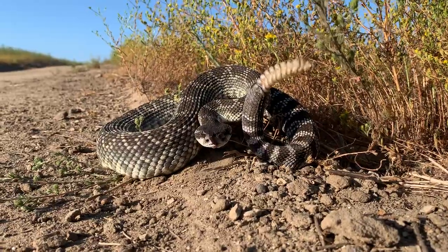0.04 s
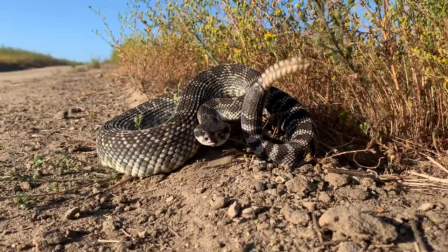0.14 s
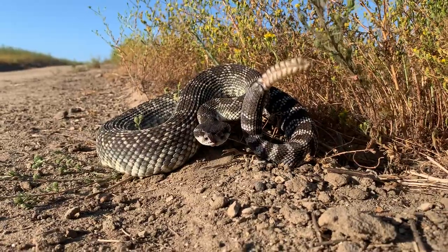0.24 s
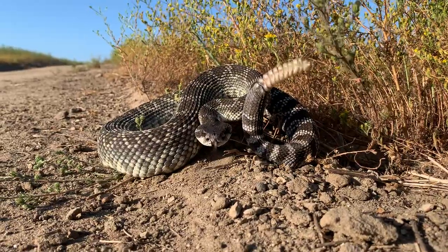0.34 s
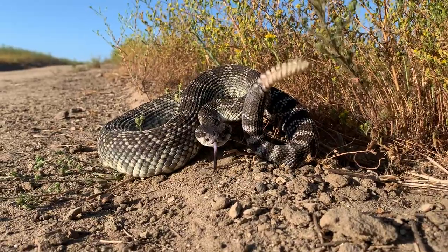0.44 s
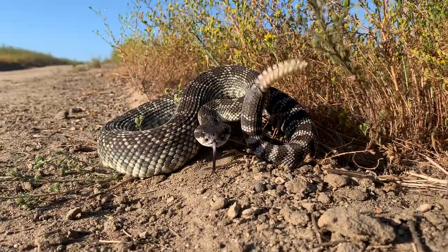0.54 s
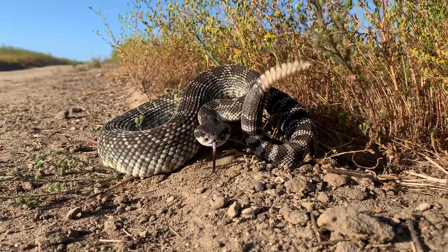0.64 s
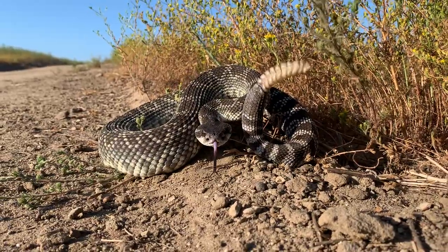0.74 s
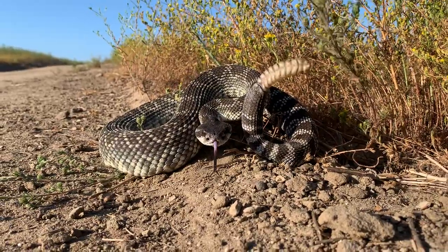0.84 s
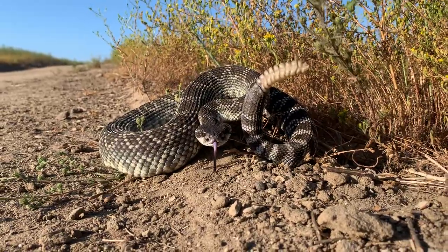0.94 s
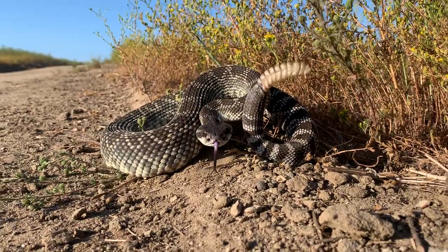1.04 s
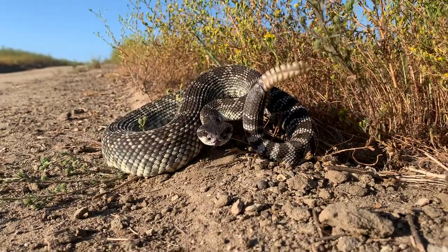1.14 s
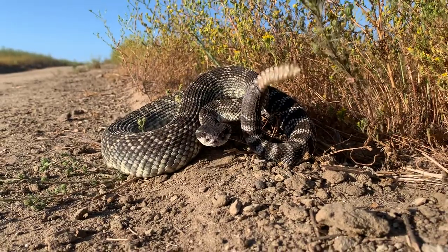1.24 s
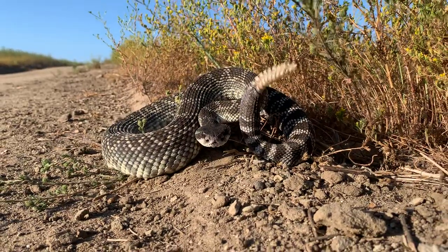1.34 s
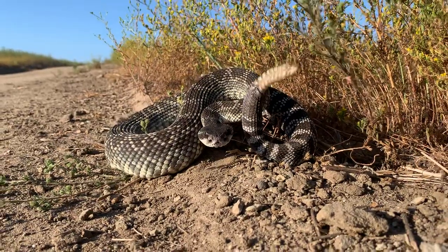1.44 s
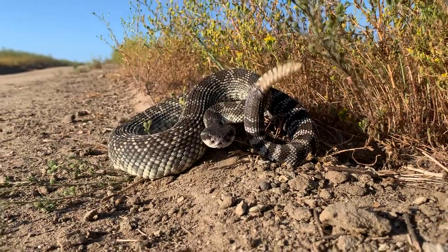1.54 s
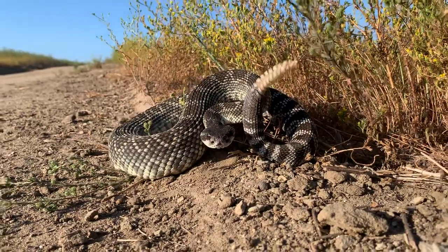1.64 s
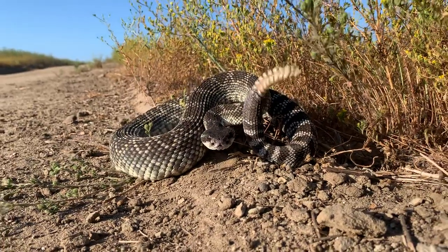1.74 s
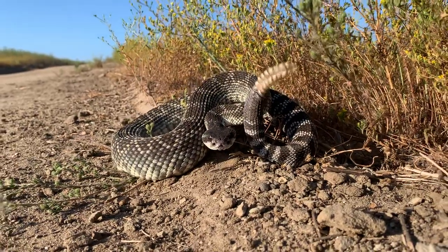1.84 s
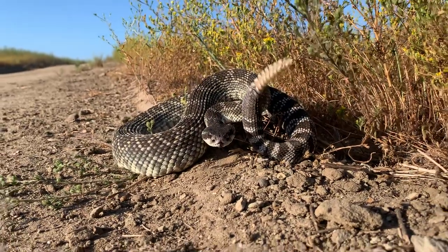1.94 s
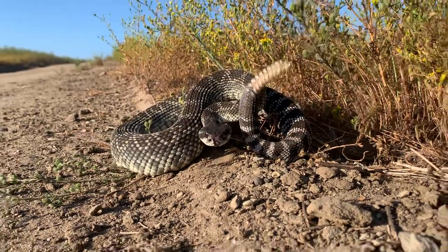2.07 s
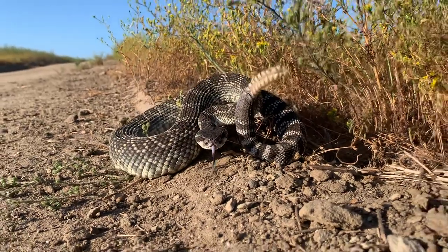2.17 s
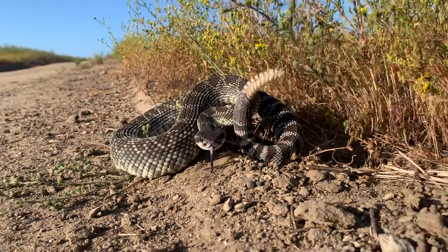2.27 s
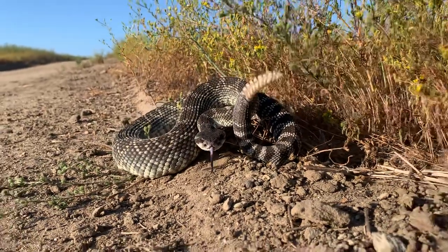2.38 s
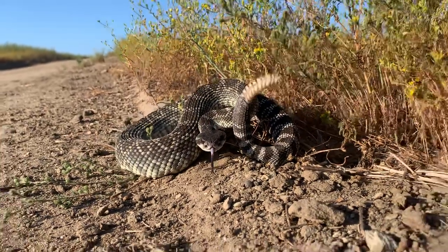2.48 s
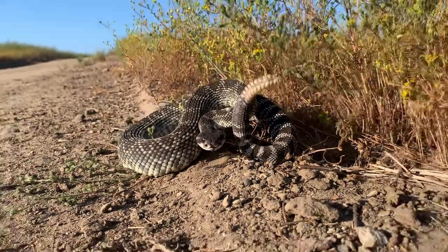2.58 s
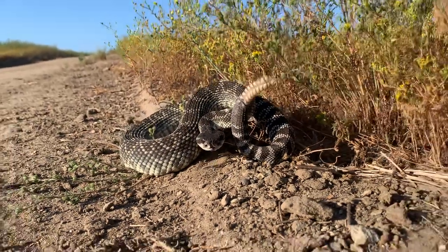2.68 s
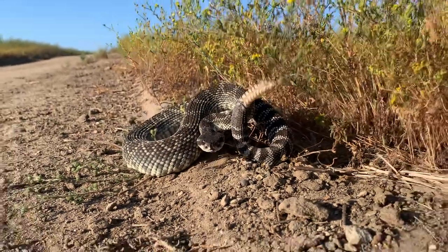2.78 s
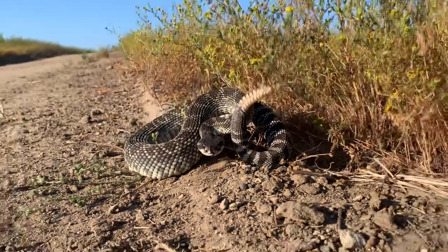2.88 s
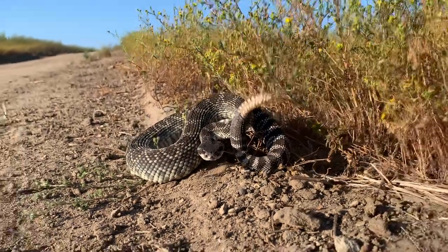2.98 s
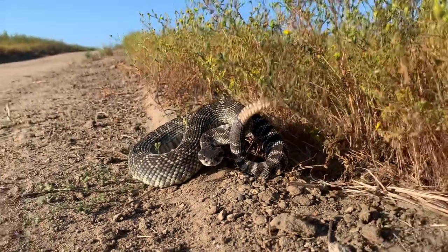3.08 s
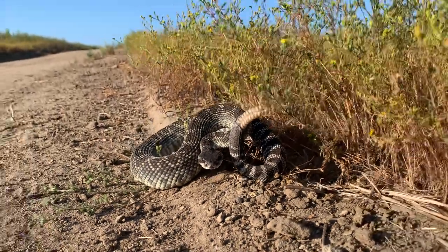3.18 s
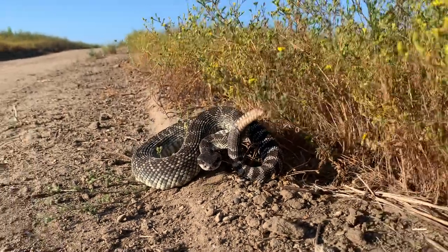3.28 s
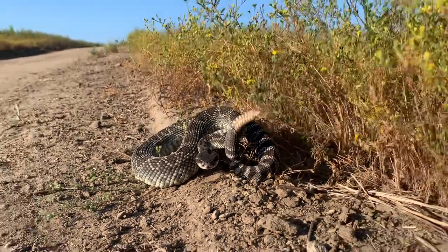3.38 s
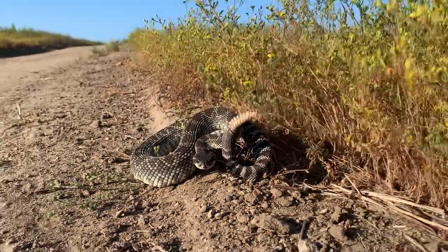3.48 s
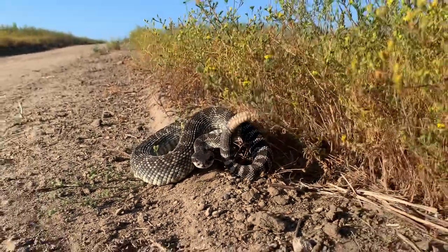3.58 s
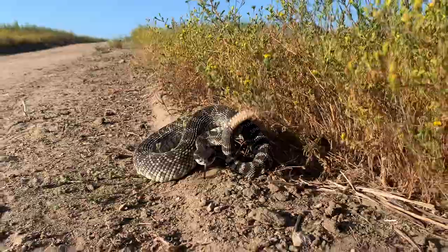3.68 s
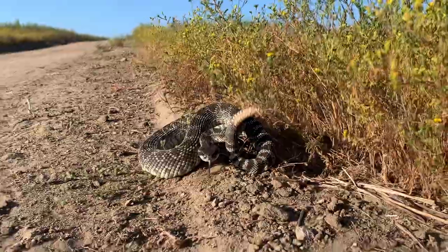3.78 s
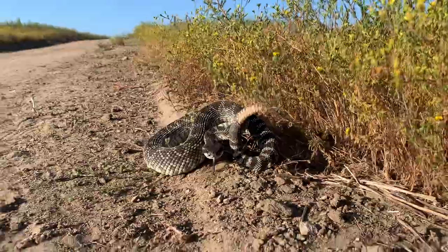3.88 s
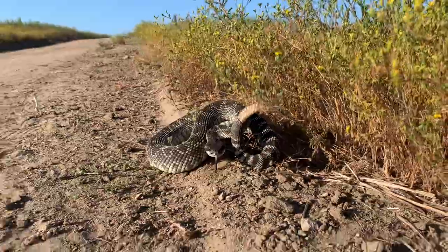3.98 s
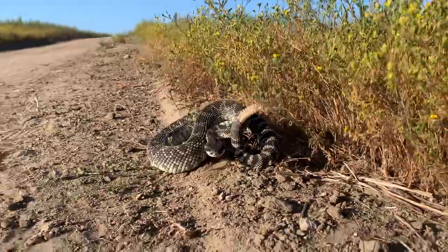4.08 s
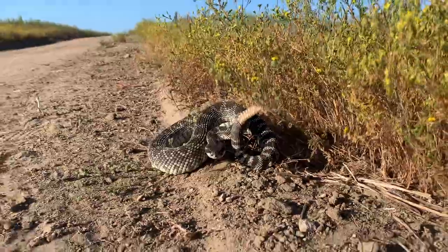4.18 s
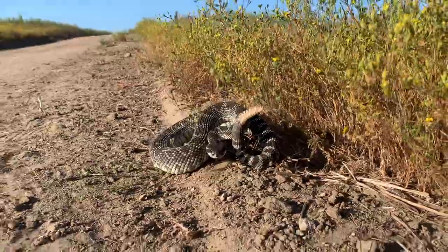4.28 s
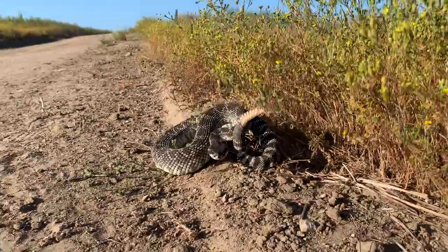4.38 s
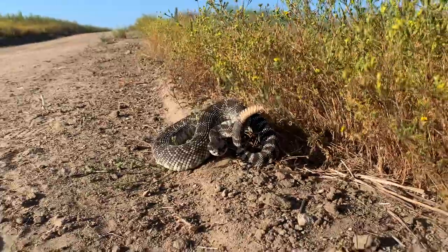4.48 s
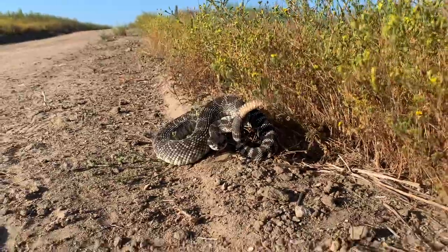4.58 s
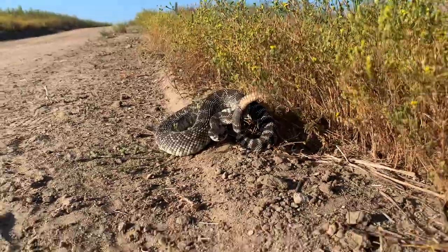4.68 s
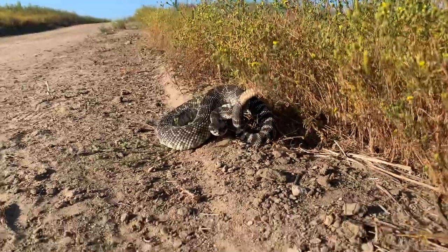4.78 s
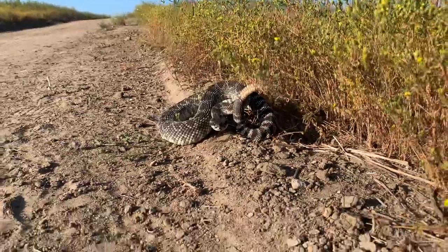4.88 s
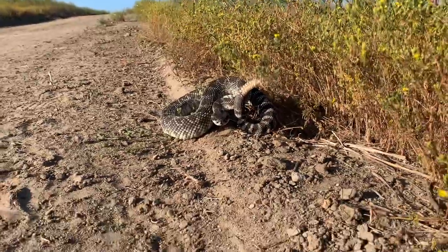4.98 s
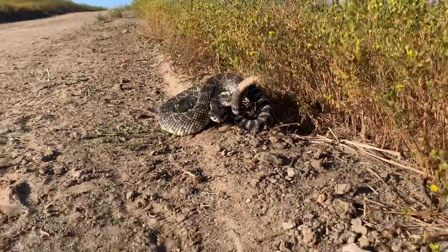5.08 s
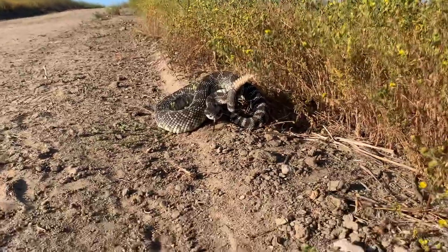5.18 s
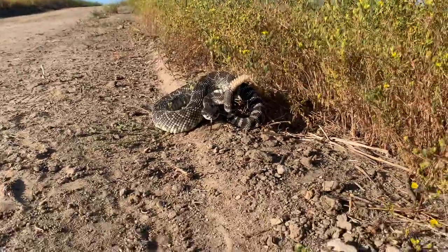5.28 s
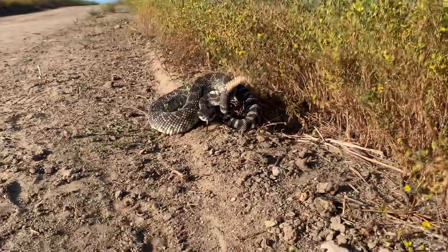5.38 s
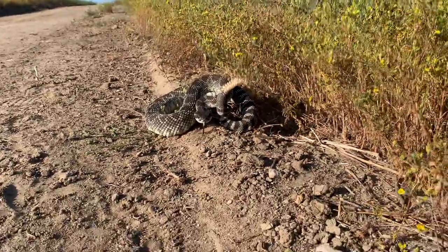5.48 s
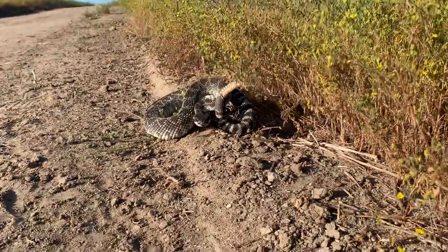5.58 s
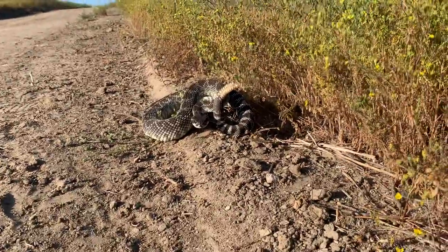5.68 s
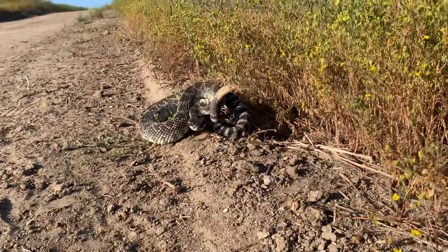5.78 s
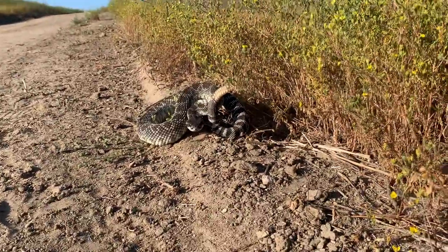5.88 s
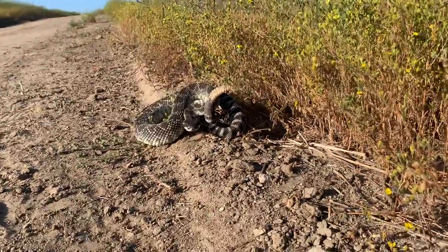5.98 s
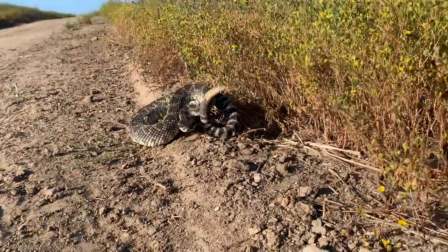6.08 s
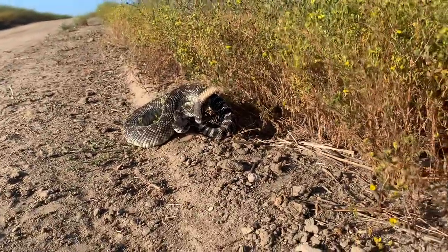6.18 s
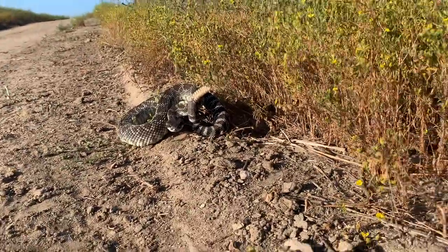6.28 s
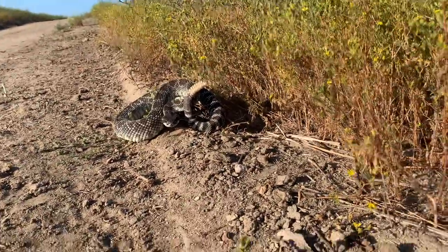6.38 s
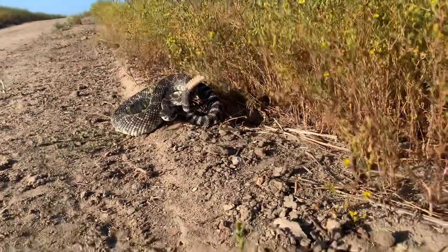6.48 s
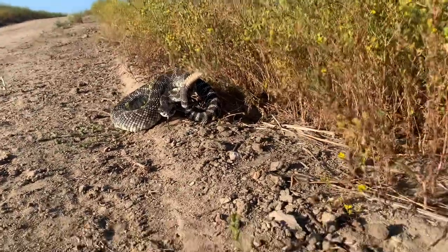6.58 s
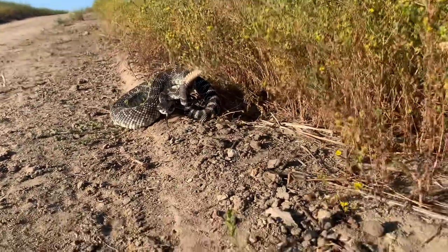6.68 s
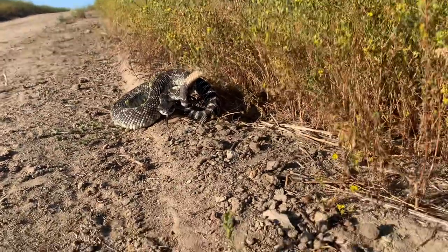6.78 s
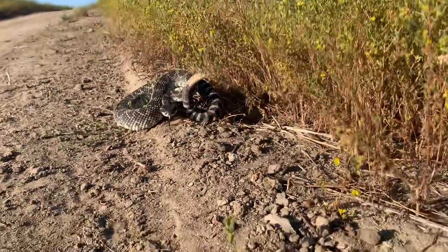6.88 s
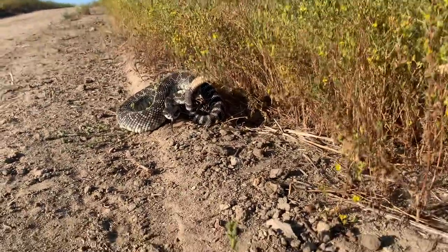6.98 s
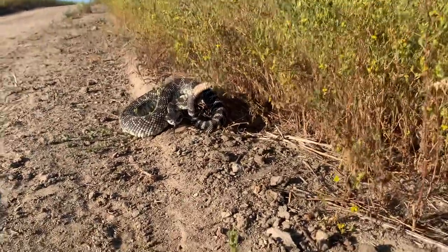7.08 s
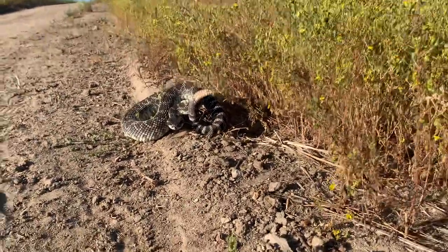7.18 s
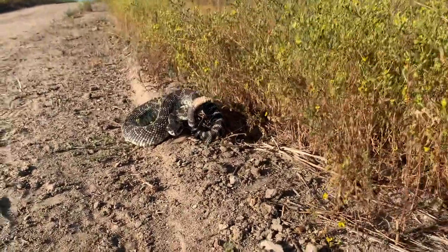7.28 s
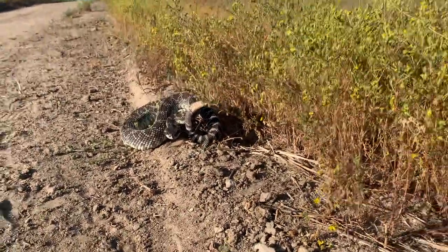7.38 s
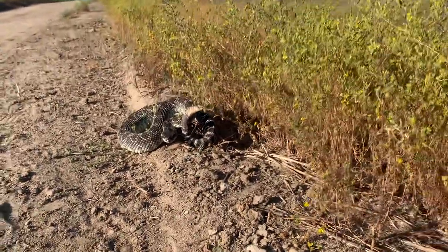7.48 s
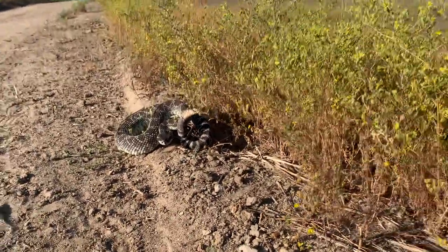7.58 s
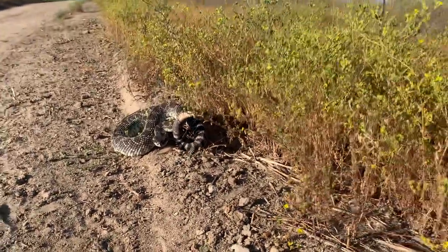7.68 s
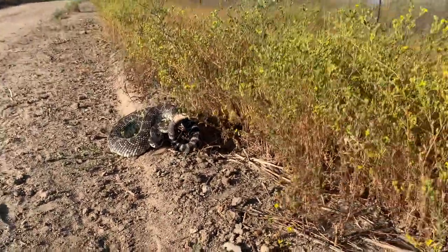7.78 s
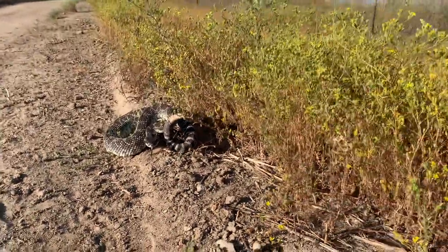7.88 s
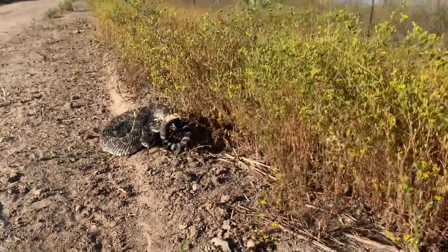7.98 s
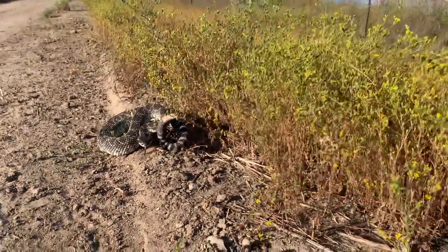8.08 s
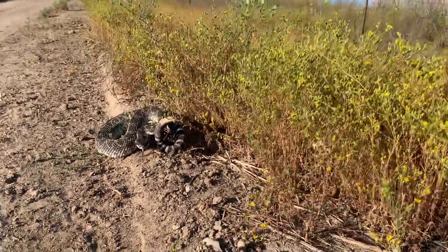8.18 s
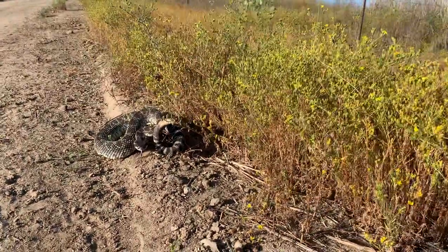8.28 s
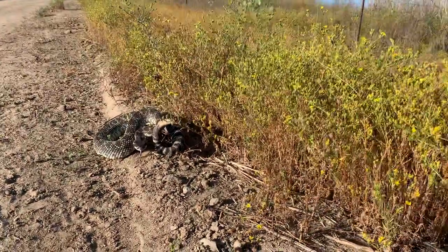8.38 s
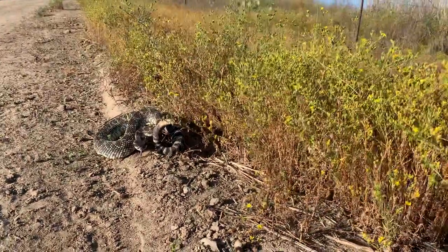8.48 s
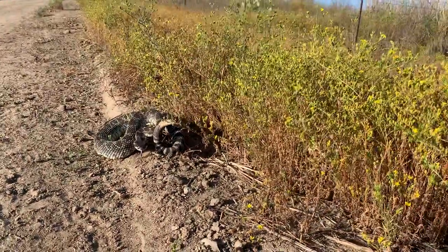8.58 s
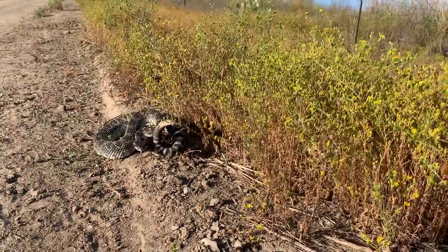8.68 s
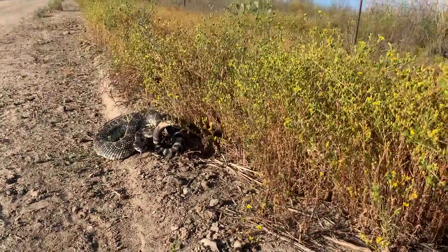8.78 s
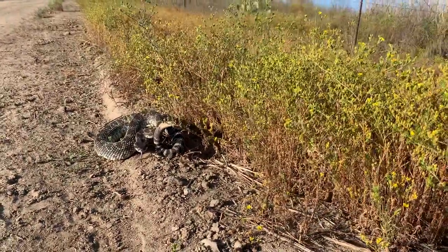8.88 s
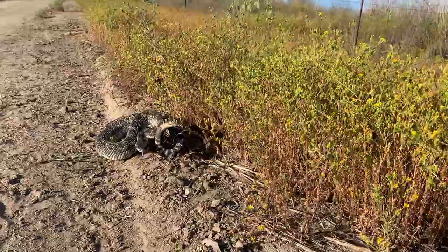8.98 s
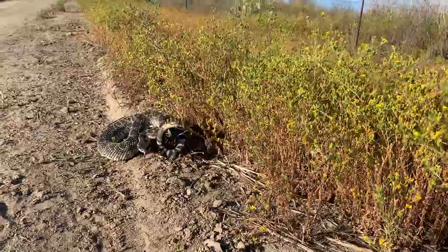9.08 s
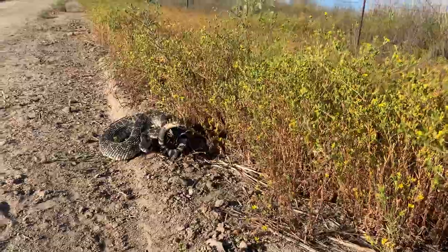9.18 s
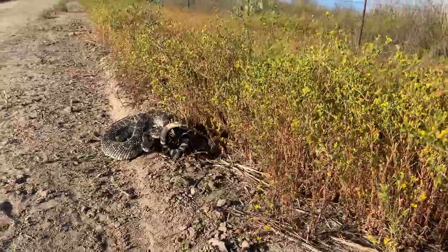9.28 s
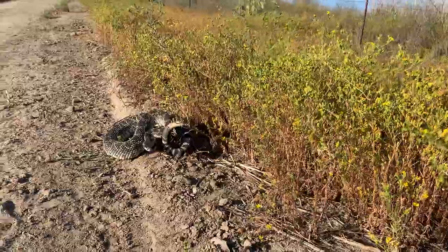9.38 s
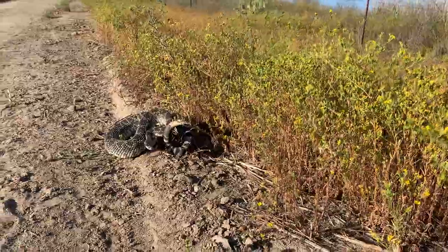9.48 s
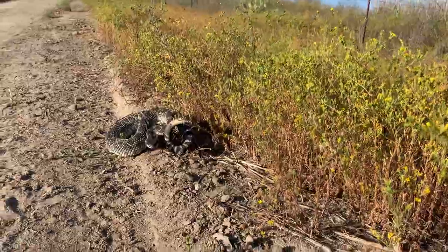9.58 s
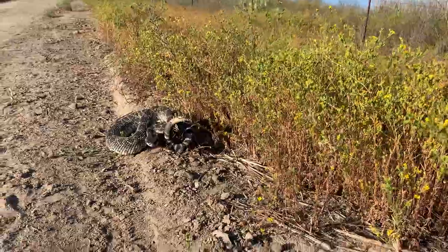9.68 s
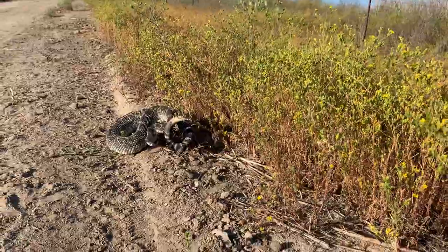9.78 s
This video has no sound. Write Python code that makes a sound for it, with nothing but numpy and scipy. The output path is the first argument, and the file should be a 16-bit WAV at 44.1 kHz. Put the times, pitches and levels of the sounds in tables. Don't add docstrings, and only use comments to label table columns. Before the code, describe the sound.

A rattlesnake's dry high buzz falters into stuttering bursts, then resumes steadily and recedes, with handling knocks, a squeaky snap and low wind puffs.

```python
import sys
import numpy as np
from scipy import signal
from scipy.fft import rfft, irfft
from scipy.io import wavfile
from scipy.ndimage import map_coordinates

SR = 44100
rng = np.random.default_rng(int(sys.argv[2]) if len(sys.argv) > 2 else 0)


def file_out(sig):
    cols = np.atleast_2d(sig).T
    lim = np.clip(cols, -1, 1)
    pcm = np.round(lim * 32767).astype(np.int16)
    wavfile.write(sys.argv[1], SR, pcm)


def rack_gain(trim_db):
    fader = np.asarray(trim_db, float)
    return 10 ** (fader / 20)


N = 433935
EVENT = SR // 2


def unit(x):
    return x / np.sqrt(np.mean(x ** 2) + 1e-20)


def columns(rows, at):
    first, *cols = np.transpose(rows)
    return [np.interp(at, first, c) for c in cols]


def colour(points, hz):
    f, value = np.transpose(points)
    return np.interp(np.log(hz + 1), np.log(f + 1), value)


def wobble(rate):
    knots = rng.standard_normal(int(N * rate / SR) + 4)
    return map_coordinates(knots, [np.arange(N) * rate / SR])


def held(t, start, length, edge):
    return np.clip(np.minimum(t - start, start + length - t) / edge + .5, 0, 1)


def spread(a, b, alike):
    angle = np.arccos(np.clip(alike, 0, 1)) / 2
    return np.cos(angle) * a + np.sin(angle) * b, np.cos(angle) * a - np.sin(angle) * b


def stereo_noise(spectrum, alike):
    gain = rack_gain(colour(spectrum, np.fft.rfftfreq(N, 1 / SR)))
    a, b = irfft(rfft(rng.standard_normal((2, N))) * gain, N)
    return unit(np.array(spread(a, b, alike)))


def ring(hz, t60, attack):
    t = np.arange(EVENT) / SR
    return np.sin(2 * np.pi * hz * t) * rack_gain(-60 * t / t60) * (1 - np.exp(-t / attack))


def place(sounds, right_late):
    out = np.zeros(N + SR)
    for s, sound in sounds:
        out[round(s * SR):][:EVENT] += sound
    return np.array([out, np.roll(out, right_late)])[:, :N]


# f/Hz, level/dB [dB per Hz]
WIND_RUMBLE = [(12, -56), (20, -18), (76, 2), (113, -5.5), (145, -4.5), (183, -14), (247, -18), (450, -25),
               (580, -28), (990, -120)]
# f/Hz, level/dB [dB per Hz]
FIELD_HUSH = [(150, -6), (400, -3), (1000, 1), (3000, 5), (8000, -9), (16000, -54)]
# t/s, level/dB [over the breeze]
GUSTS = [
    (.18, -1),
    (.55, 6),
    (2.02, 4.5),
    (2.6, 5),
    (2.92, 3),
    (5.7, 4.5),
    (7.28, 13.5),
    (7.77, 3),
    (8.68, 5),
    (9.12, 2),
]
# t/s, length/s, level/dB
LULLS = [
    (.33, 0.1, -7),
    (2.993, 0.29, -2.5),
    (4.2, .1, 0),
    (6.0, 1, 0),
    (8.142, 0.12, -2),
    (9.2, 0.26, -1.5),
]


def field():
    t = np.arange(N) / SR
    breeze_db, rise_s, fall_s = -54, 0.073, 0.031
    gust_db = sum(db * np.exp(-np.where(t < s, (s - t) / rise_s, (t - s) / fall_s)) for s, db in GUSTS)
    lull_db = sum(db * held(t, s, length, .06) for s, length, db in LULLS)
    lumps_db = 2.7 * wobble(14) + .8 * wobble(3.09)
    wind_db = breeze_db + gust_db + lull_db + lumps_db
    hush = rack_gain(-68) * stereo_noise(FIELD_HUSH, alike=0.62)
    return rack_gain(wind_db) * stereo_noise(WIND_RUMBLE, alike=0.42) + hush


# t/s, level/dB, f/Hz
STEPS = [(2.88, -37, 62), (2.945, -37, 55), (7.209, -30, 91.5), (7.247, -32, 43.1), (7.282, -26, 91),
         (7.549, -45, 109), (7.679, -41, 53.8), (7.748, -40, 107), (8.645, -35.5, 95), (9.11, -39, 114),
         (9.559, -32, 97), (9.648, -32.5, 71.7), (9.749, -58, 96.7)]


def footfalls():
    thuds = [(s, rack_gain(db + 2) * ring(hz, t60=.09, attack=.003)) for s, db, hz in STEPS]
    return place(thuds, right_late=13)


# t/s, level/dB [peak], f/Hz [top]
SNAPS = [
    (5.006, -41, 4220),
    (5.5453, -51, 4200),
    (5.6796, -21, 5500),
    (6.7384, -36, 4200),
    (7.5183, -29, 2600),
    (7.5216, -27, 3000),
    (7.9293, -42, 4200),
    (9.791, -43, 4166),
]


def snaps():
    decay = rack_gain(-60 * np.arange(EVENT) / SR / 0.022)
    sounds = []
    for s, db, top_hz in SNAPS:
        puff = rng.standard_normal(EVENT)
        puff[0] += 9
        band = signal.butter(2, [1500, top_hz], "band", fs=SR)
        sounds.append((s, rack_gain(db + 7.5) * signal.lfilter(*band, puff * decay)))
    return place(sounds, right_late=3)


# t/s, level/dB, f/Hz
SQUEAK = [
    (5.666, -55, 2050),
    (5.673, -10.5, 2040),
    (5.677, -9, 3940),
    (5.681, -12, 2170),
]


def squeak():
    slips = [(s, rack_gain(db - 2.5) * ring(hz, t60=0.021, attack=0.0022)) for s, db, hz in SQUEAK]
    return place(slips, right_late=3)


# t/s, level/dB [peak], f/Hz, t60/s, ring-on level/dB
KNOCKS = [(4.671, -47.5, 567, 0.072, -9), (4.719, -51, 560, 0.041, -16), (4.939, -35.5, 740, 0.035, -12),
          (5.007, -34.5, 605, 0.032, -37), (5.547, -24.5, 687, 0.021, -40), (5.682, -16, 600, 0.053, -18),
          (6.174, -55, 611, 0.023, 4.5), (6.427, -46, 553, 0.072, -4), (6.66, -36, 660, 0.031, -9),
          (6.719, -46, 580, 0.046, -17), (6.734, -41.5, 774, 0.045, -28), (6.745, -39.5, 595, 0.038, -30),
          (6.782, -46, 666, 0.04, -15), (6.794, -46, 624, 0.026, -10), (6.88, -58, 673, 0.053, -2),
          (7.517, -39.5, 905, 0.04, -25), (9.013, -38.5, 650, 0.03, -25), (9.051, -48, 638, 0.04, -22),
          (9.803, -50, 620, 0.04, -14)]
# f/Hz, level/dB, t60/s
MOUNT = [
    (535, -20, 0.78),
    (600, 3, 0.06),
    (705, -19.5, 3),
    (1001, -28, 3.4),
]


def knocks():
    flutter = rack_gain(1.1 * wobble(81)[:EVENT]) * (1 + 0.36 * wobble(167)[:EVENT])
    modes = sum(rack_gain(db) * ring(hz, t60, attack=0.01) for hz, db, t60 in MOUNT)
    tail = flutter * np.linspace(1, 0, EVENT) * modes
    sounds = []
    for s, db, hz, t60, tail_db in KNOCKS:
        thump = ring(hz, t60, attack=0.0015)
        sounds.append((s, rack_gain(db + 5.5) * (thump + rack_gain(tail_db) * tail)))
    return place(sounds, right_late=13)


# t/s, first delay/ms, second delay/ms, share
ECHOES = [(0, 1.1, 5.1, .08), (5.5, .9, 4.6, .14), (6.7, .9, 4.5, .1), (6.85, 2.1, 4.5, .2),
          (7.5, 2, 4.3, .2), (7.9, 1.75, 4, .27), (8.5, 1.6, 3.7, .33), (9.45, 1.55, 3.6, .3),
          (9.84, 1.5, 3.4, .15)]


def soil_echo(f, s):
    first_ms, second_ms, share = columns(ECHOES, s)
    first = np.exp(-2j * np.pi * f * first_ms / 1000)
    second = np.exp(-2j * np.pi * f * second_ms / 1000)
    return 1 + share * (f < 7800) * (first + .7 * second)


# t/s, length/s, presence level/dB, upper band level/dB
SWITCHES = [(2.37, 0.074, 4, 2), (2.955, .12, -21, -14.5), (4.692, 0.17, 4, 2), (5.06, .41, 5.5, 1),
            (5.985, 0.19, -12, -6), (6.266, 0.16, -4, -5.5), (6.424, 0.4, -3, 0.5),
            (6.775, 0.274, -8, -5.5), (7.055, 0.28, 1.5, -2), (7.293, 0.27, -8.5, -11.5),
            (7.556, 0.235, -4, -5.5), (7.776, 1.18, -6, -3.5), (8.975, 0.26, -7.5, -3.5),
            (9.231, .24, -11, -2), (9.53, 0.55, 5.5, 1.5)]


def port_mix(s, away, turn):
    presence_db, upper_db = sum(held(s, start, length, edge=.03) * np.array([[a_db], [b_db]])
                                for start, length, a_db, b_db in SWITCHES)
    left_db = 2.5 + presence_db
    right_db = -11 + 0.35 * presence_db + 7 * turn
    return left_db, right_db, -1.5 - 5.5 * away + upper_db


# f/Hz, facing the snake/rad, turned aside/rad
LAG = [(0, 0, 0), (700, .9, .2), (1400, 1.1, .1), (1800, 1.7, .2), (2100, 3.05, 0), (2400, 3.1, 0),
       (3000, 3.2, 0), (3300, 3.4, .3), (3450, 5, .6), (3500, 5.4, 7.2), (3600, 6.3, 7.5), (4400, 11, 8.2),
       (4800, 12.4, 9.2), (5300, 13.4, 9.5), (6000, 13.9, 9.2), (6500, 14.3, 8.7), (7000, 15, 9.42),
       (7450, 15.6, 9.3), (7700, 13.6, 13.3), (9000, 13.7, 13.6), (11000, 12.7, 12.7),
       (11800, 12.57, 12.57)]
# f/Hz, power
BEND = [(4300, 1), (4850, .32), (5700, 1), (6300, 1.5), (7400, 2.6)]
# f/Hz, start t/s, span/s
LINE_UP = [(1900, 0, 6.2), (2100, 4.5, 3.8), (2300, 3, 5.5), (2550, 1.8, 8), (2800, 4.7, 1.9),
           (3250, 5.8, .6)]


def port_lag(f, s, away, turn):
    ahead, aside = columns(LAG, f)
    start, span = columns(LINE_UP, f)
    turn = np.where(f > 6200, np.maximum.accumulate(turn), turn)
    bent = np.sign(turn) * abs(turn) ** columns(BEND, f)[0]
    turn = np.where(f > 3480, bent, np.clip((s - start) / span, 0, 1))
    tremor = wobble(9)[np.minimum(s * SR, N - 1).astype(int)]
    sway = (.17 - .09 * away) * tremor * (f > 1900) * (f < 11000)
    return sway + ahead + turn * (aside - ahead)


# t/s, shakes per s
SHAKE = [(0, 52), (1, 50), (1.9, 49), (2.5, 61.6), (3.3, 62), (3.7, 62.8), (4.5, 61), (5, 61), (6.1, 58.3),
         (6.5, 59.9), (7.1, 59), (7.7, 62.6), (8.7, 59.3), (9.84, 57.5)]


def clatter(steady):
    t = np.arange(N) / SR
    quarters = 4 * np.cumsum(columns(SHAKE, t)[0] * (1 + .004 * wobble(4))) / SR
    k = np.arange(1, int(quarters[-1]))
    jitter, scatter = rng.standard_normal((2, len(k)))
    when = np.interp(k + .09 * jitter, quarters, np.arange(N)).astype(int)
    volley_db = np.take([0, -4.5, -3.5, -5.5], k % 4) + 2 * scatter
    hits = np.bincount(when, rack_gain(volley_db) ** 2, N)
    stray = rng.random(N) < 700 / SR
    hits = hits + stray * rack_gain(-10 + 2.0 * rng.standard_normal(N)) ** 2
    u = np.arange(400) / SR / .00045
    power = signal.fftconvolve(hits, u ** 3 * np.exp(-u))[:N]
    return .8 * steady + abs(power) / np.mean(power)


# t/s, level/dB
HISS = [(0, -25.5), (.3, -27), (.8, -27.5), (1.06, -28.5), (1.95, -28.5), (2.1, -26.5), (3, -29),
        (4.2, -31), (4.9, -33), (5.7, -34.5), (6.1, -34.5), (6.6, -35), (7.3, -35.3), (8.2, -36.5),
        (8.8, -36), (9.84, -35.5)]
# fading t/s, still t/s, restart t/s, full t/s, depth level/dB
PAUSES = [(1.091, 1.097, 1.116, 1.121, -9), (1.145, 1.178, 1.18, 1.191, -19),
          (1.218, 1.261, 1.266, 1.291, -32), (1.313, 1.334, 1.367, 1.389, -23),
          (1.409, 1.442, 1.461, 1.476, -32), (1.502, 1.54, 1.549, 1.556, -36),
          (1.589, 1.589, 1.612, 1.617, -11), (1.642, 1.673, 1.674, 1.681, -21),
          (1.713, 1.747, 1.751, 1.756, -32), (1.848, 1.854, 1.858, 1.862, -9),
          (1.897, 1.899, 1.914, 1.925, -10), (1.95, 1.955, 1.963, 1.98, -4)]


def shell_clicks():
    t = np.arange(N) / SR
    level_db = columns(HISS, t)[0] + 0.3 * wobble(12) + 0.13 * wobble(4)
    falter_db = sum(np.interp(t, times, [0, depth_db, depth_db, 0]) for *times, depth_db in PAUSES)
    steady = rack_gain(0.9 * falter_db)
    power = clatter(steady)
    envelope = np.sqrt(power / (power.mean() * (.5 + .5 * steady)))
    return envelope * rack_gain(level_db + falter_db) * rng.standard_normal((2, N))


# t/s, near 0 - far 1
AWAY = [(0, 0.28), (2.5, 0.49), (4.5, 0.7), (5.8, 0.96), (6.2, 0.9), (7.2, 0.99), (7.6, 1), (9.84, 1)]
# t/s, turn 0-1
TURN = [(0, -.08), (3.2, .16), (4.5, .24), (5.9, .28), (6.5, .4), (7, .38), (7.3, .6), (7.68, .65),
        (7.8, 1), (8.9, 1), (9.1, .85), (9.45, .85), (9.84, .6)]
# f/Hz, level/dB [dB per Hz]
NEAR = [(350, -32.5), (800, -18), (1400, -23), (2000, -17), (2700, 6.5), (3300, -7.5), (4200, 1.5),
        (5200, -4.5), (6400, 0.5), (7600, 3.5), (8300, -1), (11000, 2), (13900, -4), (15600, -1.5)]
# f/Hz, level/dB [dB per Hz]
FAR = [(350, -29), (800, -18.5), (1400, -18.5), (2000, -17.5), (2700, -9), (3300, -6), (4200, 11),
       (5200, 7), (6400, 11.5), (7600, 11), (8300, 8), (10600, 7), (12000, 8.5), (13900, 3), (15600, 5)]
# f/Hz, likeness 0-1
ALIKE = [(400, .95), (2000, .95), (2600, .98), (3300, .975), (4200, .87), (4800, .985), (7300, .99),
         (8000, .83), (10000, .92), (11500, 1)]


def rattle():
    frame = dict(fs=SR, nperseg=512, noverlap=384)
    hz, s, clicks = signal.stft(shell_clicks(), **frame)
    f = hz[:, None]
    away, turn = columns(AWAY, s)[0], columns(TURN, s)[0]
    left_db, right_db, upper_db = port_mix(s, away, turn)
    presence = np.interp(f, [2400, 4310, 5030, 5430], [0, 1, 1, 0])
    upper = np.interp(f, [4890, 6650], [0, 1]) * (f < 8100)
    shadow = np.interp(f, [2870, 3390, 3940, 4950, 5290, 6060], [0.2, 0.59, 0.9, 1.123, 0.16, -0.029])
    tone_db = (1 - away) * colour(NEAR, f) + away * colour(FAR, f) + upper * upper_db + 4.0
    right_tone_db = tone_db + presence * right_db
    left_tone_db = right_tone_db + shadow * (left_db - right_db)
    half_lag = np.exp(.5j * port_lag(f, s, away, turn))
    left, right = spread(*(clicks * soil_echo(f, s)), colour(ALIKE, f))
    ports = np.array([left * rack_gain(left_tone_db) / half_lag, right * rack_gain(right_tone_db) * half_lag])
    return signal.istft(ports, **frame)[1][:, :N]


def scene():
    return field() + footfalls() + snaps() + squeak() + knocks() + rattle()


def low_pass(x):
    return signal.sosfilt(signal.butter(12, 17100, fs=SR, output="sos"), x)


def record(dry):
    below_limit = np.fft.rfftfreq(N, 1 / SR) < 15900
    mix = irfft(rfft(dry) * below_limit, N)
    return low_pass(mix)


dry = scene()
out = record(dry)
file_out(out)
```